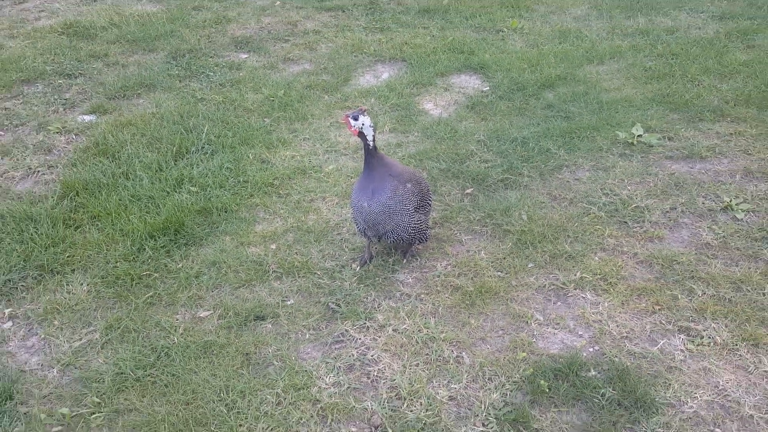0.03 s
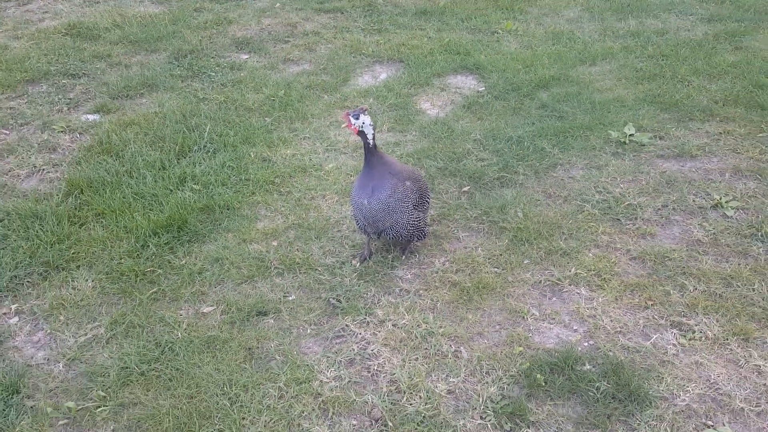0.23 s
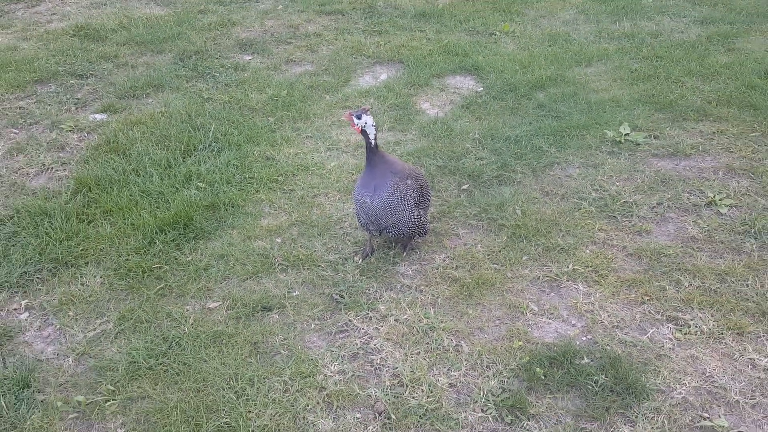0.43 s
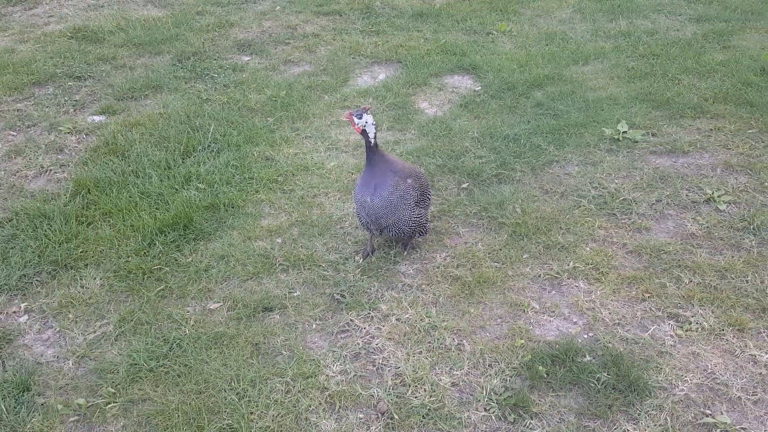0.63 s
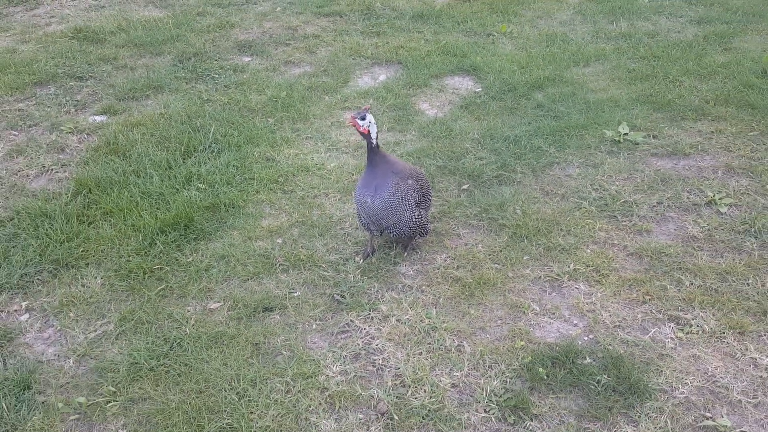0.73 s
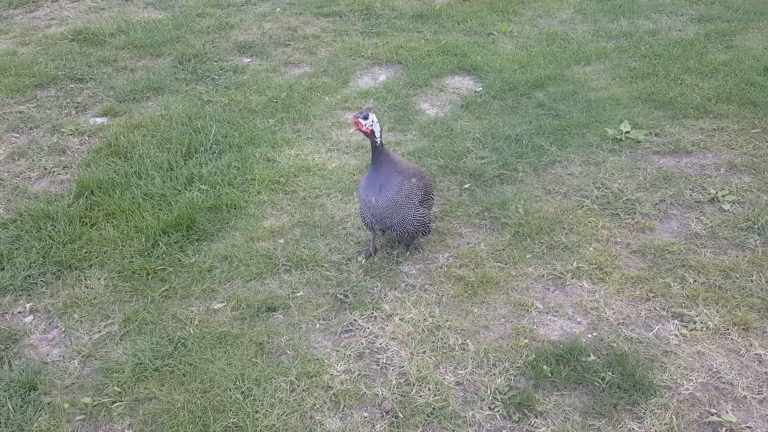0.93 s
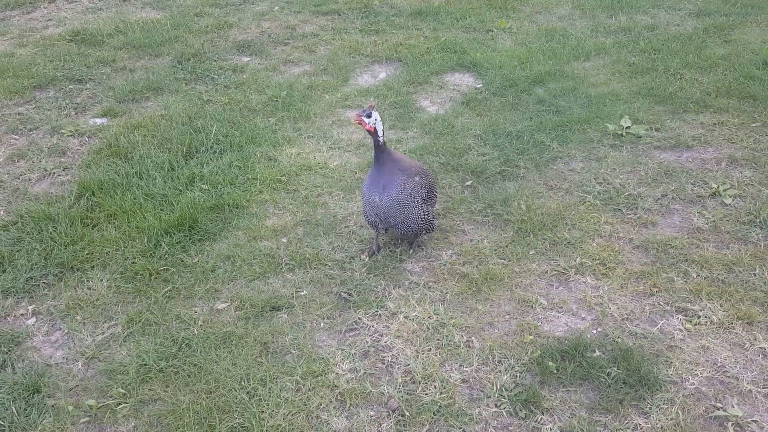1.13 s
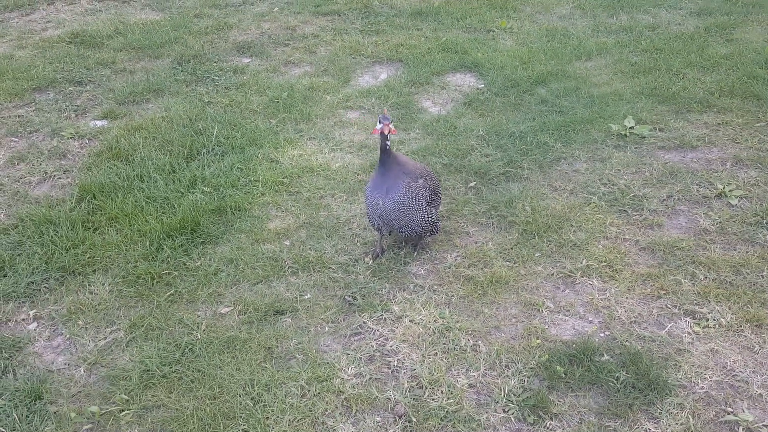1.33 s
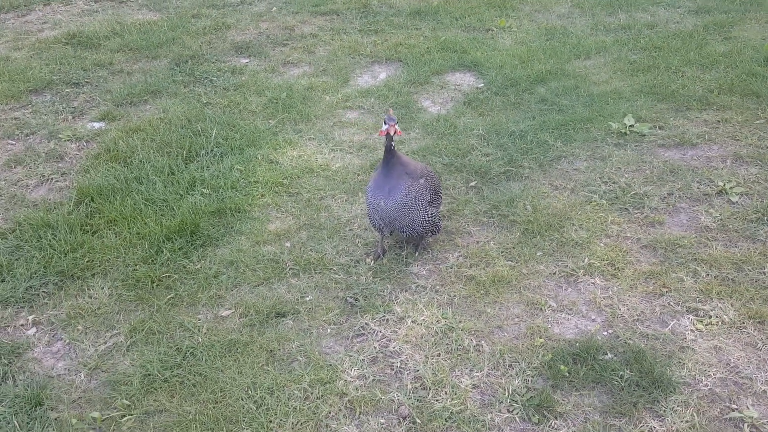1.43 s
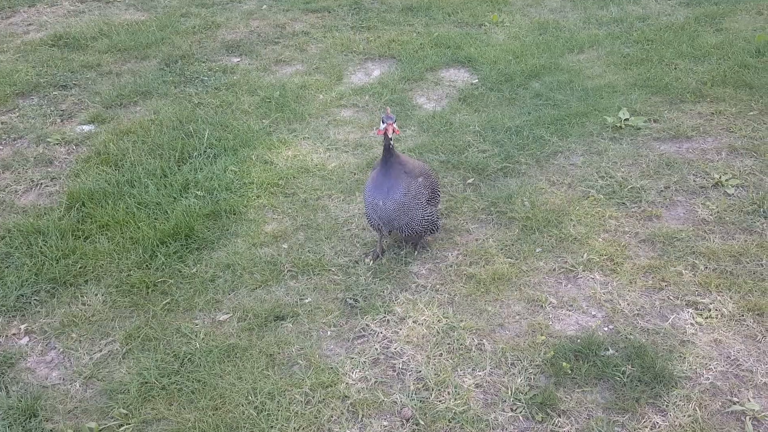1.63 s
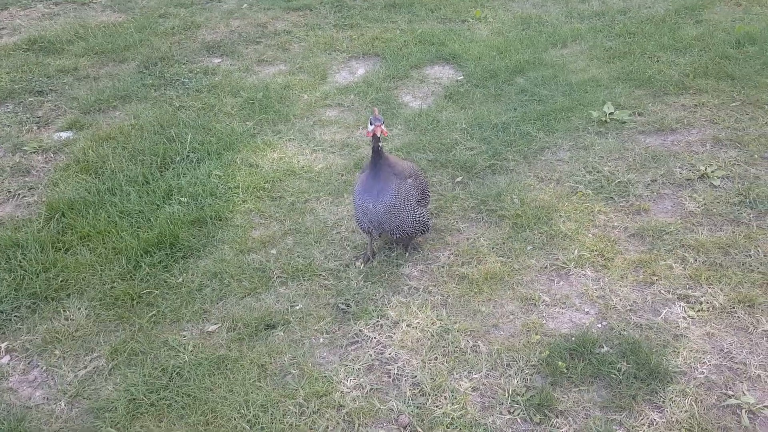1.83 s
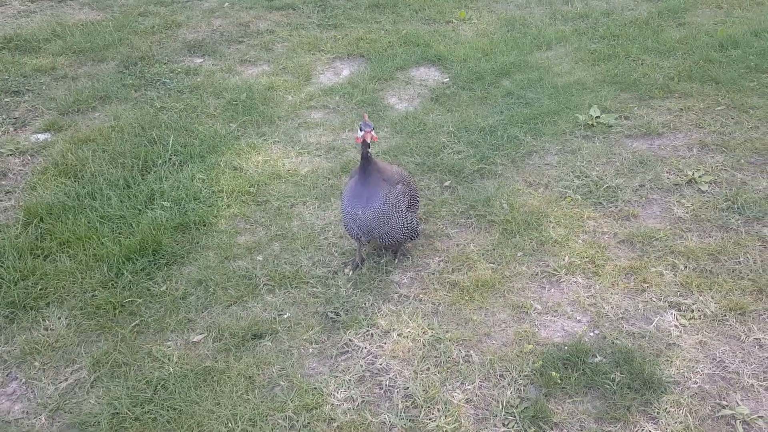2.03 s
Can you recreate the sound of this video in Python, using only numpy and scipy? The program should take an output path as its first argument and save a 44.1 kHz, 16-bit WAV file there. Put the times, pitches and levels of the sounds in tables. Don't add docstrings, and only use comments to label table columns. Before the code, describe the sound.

A guinea fowl in front of a stereo microphone outdoors clucks softly at the very start, then gives a short, loud whistle near 0.23 seconds that stutters into a rasp by 0.36. Cluck and call repeat at 0.72 and 0.95, then 1.47 and 1.73, growing harsher and hissier, ending near 1.86. Faint small-bird chirps fall between and after; steady low distant traffic rumbles beneath.

```python
import sys
import numpy as np
from scipy import signal
from scipy.fft import rfft, irfft
from scipy.io import wavfile
from scipy.ndimage import uniform_filter1d

SR = 44100
rng = np.random.default_rng(int(sys.argv[2]) if len(sys.argv) > 2 else 0)


def master(y):
    cut = np.clip(np.atleast_2d(y).T, -1, 1)
    pcm = np.round(cut * 32767)
    wavfile.write(sys.argv[1], SR, pcm.astype(np.int16))


def decibels_to_gain(level_db):
    exponent = np.asarray(level_db, float) / 20
    return 10 ** exponent


N = 92610
T = np.arange(N) / SR


def at_hz(points, hz):
    table = np.array(points)
    return np.interp(np.log(hz), np.log(table[:, 0]), table[:, 1])


def spectrum_hz():
    return np.arange(N // 2 + 1) * SR / N + 1


def rms_one(x):
    return x / np.sqrt(np.mean(x ** 2) + 1e-20)


def drift(rate_hz):
    r = np.exp(-2 * np.pi * rate_hz / SR)
    wander = signal.lfilter([1], [1, -2 * r, r * r], rng.standard_normal(N + SR))
    return rms_one(wander[SR:])


def resonate(x, peaks):
    out = 0
    for k, (hz, width, db) in enumerate(peaks):
        r = np.exp(-np.pi * width * 1.5 / SR)
        b = (1 - r * r) / 2 * np.array([1, 0, -1])
        a = [1, -2 * r * np.cos(2 * np.pi * hz / SR), r * r]
        ringing = signal.lfilter(b, a, signal.lfilter(b, a, x))
        out = out + (-1) ** k * decibels_to_gain(db) * ringing
    return rms_one(out)


def glide(start, length, hz, db, soft=.5):
    u = np.clip((T - start) / length, 0, 1)
    pitch = np.polyval(np.polyfit([0, .5, 1], hz, 2), u)
    swell = np.sin(np.pi * u).clip(0) ** soft * (u < 1)
    return 2 * decibels_to_gain(db) * swell * np.sin(2 * np.pi * np.cumsum(pitch) / SR)


# [f/Hz, level/dB per Hz]
AIR_SPECTRUM = [(25, -24.5), (62, 2), (110, -0.5), (350, -14), (1500, -17), (4200, -26.5), (9500, -52.5),
                (13000, -58)]
# [f/Hz, likeness -1..1]
AIR_LIKENESS = [(60, 0.98), (240, 0.91), (950, -0.16), (3770, 0.091), (15000, -0.39)]


def air():
    out, together = 0, drift(2.0)
    edges = 22 * 2 ** np.arange(0, 9.6, .5)
    white = rng.standard_normal((2, 2, N + SR // 4))
    for k, (low, high) in enumerate(zip(edges, edges[1:])):
        band = signal.butter(2, [low, high], "band", fs=SR, output="sos")
        mid, side = signal.sosfilt(band, white[k % 2])[:, SR // 4:]
        alike = np.clip(at_hz(AIR_LIKENESS, np.sqrt(low * high)), -1, 1)
        gain = decibels_to_gain(0.16 * together + 2.14 * drift(8.9))
        out = out + gain * (np.sqrt(1 + alike) * mid + np.sqrt(1 - alike) * side * [[1], [-1]])
    colored = irfft(rfft(out) * decibels_to_gain(at_hz(AIR_SPECTRUM, spectrum_hz())), N)
    return decibels_to_gain(-35.5) * rms_one(colored)


# [t/s, level/dB]
YARD_ECHOES = [
    (.115, -42),
]


def yard(x):
    tail_db, t60_s = -29, .4
    t = np.arange(SR // 2) / SR
    tail = rng.standard_normal((2, len(t))) * decibels_to_gain(-60 * t / t60_s) * (t > .01)
    tail = decibels_to_gain(tail_db) * tail / np.sqrt(np.sum(tail ** 2, axis=1, keepdims=True))
    for s, db in YARD_ECHOES:
        tail[:, int(s * SR)] += decibels_to_gain(db)
    return signal.fftconvolve(x[None], tail, axes=1)[:, :N]


# [t/s, length/s, start f/Hz, middle f/Hz, end f/Hz]
CHIRP_GLIDES = [(.404, .022, 4700, 5600, 4600), (.424, .019, 4700, 4400, 4150),
                (.491, .024, 3700, 4850, 3700), (.81, .012, 4000, 4300, 4500), (.82, .01, 4700, 4700, 3800),
                (.829, .007, 3900, 4200, 4100), (.846, .022, 3350, 3300, 3100),
                (.868, .025, 2900, 2700, 2550), (1.201, .011, 3200, 3500, 4000),
                (1.212, .019, 4400, 4720, 4750), (1.23, .01, 4750, 5500, 4200),
                (1.239, .017, 4150, 3800, 3550), (1.255, .007, 3550, 3300, 3000),
                (1.262, .024, 3700, 4050, 3850), (1.278, .026, 3150, 3550, 4150),
                (1.303, .009, 4250, 4200, 3800), (1.312, .016, 3550, 3200, 3000),
                (1.618, .016, 4800, 4650, 4350), (1.634, .011, 4400, 4100, 3400),
                (1.647, .012, 4250, 4050, 3400), (1.679, .012, 3600, 3600, 3000),
                (1.693, .007, 3350, 3400, 3350), (1.702, .007, 3250, 3300, 3350),
                (1.969, .019, 3850, 4250, 4500), (1.974, .016, 3350, 3620, 3800),
                (1.988, .024, 3800, 3600, 3300), (2.01, .034, 3330, 2930, 2620),
                (2.042, .017, 2640, 2580, 2520), (1.222, .04, 1680, 1660, 1600),
                (1.26, .012, 1250, 1030, 980), (1.266, .028, 2000, 2000, 1990)]
CHIRP_LEVELS = [-58, -51, -48.5, -49, -46, -46, -49, -58, -58, -63, -59, -51, -50.5, -49, -45.5, -56, -49,
                -39, -48, -43, -41.5, -42, -48, -52, -53, -46.5, -46, -54, -46, -46, -50.5]


def small_birds():
    chirps = 0
    for (s, length, *hz), db in zip(CHIRP_GLIDES, CHIRP_LEVELS):
        chirps = chirps + glide(s, length, hz, db, soft=.3)
    return chirps * decibels_to_gain(1.5 * drift(100))


# [f/Hz, left over right level/dB]
FOWL_PAN = [(1560, 4), (1690, 1.5), (2400, 4), (3100, 1.3), (4600, .5), (13000, -3.5)]
# [f/Hz, left lead/radians]
FOWL_LEAD = [(1550, 0.28), (4600, 0.5), (13000, 0.95)]


def place(x, more_lead):
    hz = spectrum_hz()
    lead = at_hz(FOWL_LEAD, hz) + more_lead * np.minimum(1, 1550 / hz) ** 2
    half = decibels_to_gain(at_hz(FOWL_PAN, hz) / 2) * np.exp(.5j * lead)
    return np.array([irfft(rfft(x) * half, N), irfft(rfft(x) / half, N)])


def slaps():
    rate_hz = 1540 * (1 + 0.044 * drift(300))
    beat = np.diff(np.floor(np.cumsum(rate_hz) / SR), prepend=0)
    return beat * (drift(180) + rng.standard_normal(N)) + .2 * rng.standard_normal(N)


# [f/Hz, width/Hz, level/dB]
HISS_PEAKS = [(7600, 700, 1), (9100, 500, -2), (10900, 500, 0), (11900, 700, -2)]
# [f/Hz, width/Hz, level/dB]
BEAK_TIP_PEAK = [(14200, 340, 0)]


def rough(throat, air_s, rasp_s, end_s, rasp_db, hiss_db):
    edge_s, leak, sag = 0.0071, decibels_to_gain(-15), decibels_to_gain(-5.5)
    times = [air_s - edge_s, air_s, rasp_s - edge_s, rasp_s + edge_s, end_s - edge_s, end_s + edge_s]
    low = np.interp(T, times, [0, leak, leak, 1, sag, 0])
    high = np.interp(T, times, [0, .6, .7, 1, .5, 0])
    breath = rng.standard_normal(N)
    tip_gain = decibels_to_gain(np.interp(T, [rasp_s, end_s], [0, -24])) * 0.58
    hiss = resonate(breath, HISS_PEAKS) + tip_gain * resonate(breath, BEAK_TIP_PEAK)
    return decibels_to_gain(rasp_db) * low * resonate(slaps(), throat) + decibels_to_gain(hiss_db) * high * hiss


# [t/s, level/dB, low squeak level/dB, high squeak level/dB, beak hiss level/dB]
CLUCK_HITS = [
    (-.016, -36, -2, -5, -72),
    (.717, -33, -3, -10, -69),
    (1.471, -29, -11, -8, -58),
]
# [t/s after its start, length/s, start f/Hz, end f/Hz, level/dB]
CLUCK_SQUEAKS = [(0, .028, 2500, 2550, -9), (.017, .033, 3100, 2950, -11), (.001, .022, 5000, 5150, -8),
                 (.016, .024, 5400, 5850, -15.5), (.022, .032, 6300, 5750, -17),
                 (.028, .02, 4800, 4680, -7), (.028, .025, 1330, 1270, -7)]
# [air t/s, rasp t/s, end t/s after its start]
CLUCK_ROUGH = (.018, .03, .052)
# [f/Hz, width/Hz, level/dB]
CLUCK_PEAKS = [(1300, 80, -2), (1700, 200, -6), (1050, 100, -9), (2400, 400, -17), (4600, 400, -15),
               (5800, 600, -22)]


def clucks():
    out = 0
    for s, db, low_db, high_db, hiss_db in CLUCK_HITS:
        out = out + rough(CLUCK_PEAKS, *(s + np.array(CLUCK_ROUGH)), db - 1, hiss_db)
        for after, length, a, b, part_db in CLUCK_SQUEAKS:
            register_db = 0 if a < 2000 else low_db if a < 4000 else high_db
            squeak = glide(s + after, length, [a, (a + b) / 2, b], db + part_db + register_db)
            out = out + squeak * decibels_to_gain(2.0 * drift(150))
    return out


# [air t/s, rasp t/s, end t/s, rasp level/dB, beak hiss level/dB]
CALL_RASPS = [
    (0.232, 0.322, 0.363, -28, -73),
    (0.958, 1.029, 1.083, -25.5, -58),
    (1.726, 1.772, 1.858, -24, -52),
]
# [f/Hz, width/Hz, level/dB]
CALL_THROAT = [(1107, 35, -3), (1560, 150, -8), (1860, 174, -9.5), (2447, 330, -12), (3150, 480, -25),
               (4587, 470, -13), (5280, 243, -13.5), (5757, 500, -22.5)]


def rasps():
    return sum(rough(CALL_THROAT, *r) for r in CALL_RASPS)


# [t/s, length/s, peak level/dB, f/Hz]
RASP_STUTTERS = [(0.321, 0.0032, -17.2, 1590.0), (0.3258, 0.002, -18, 1690.0),
                 (0.3272, 0.0027, -19.5, 1760.0), (0.33, 0.0037, -21, 1710.0), (0.334, 0.0052, -21, 1730.0),
                 (0.3376, 0.0084, -22, 1630.0), (0.347, 0.0029, -24, 1680.0), (0.3495, 0.0015, -32, 1620.0),
                 (0.3505, 0.011, -20, 1610.0), (0.363, 0.0025, -39, 1500.0), (1.034, 0.0027, -19.5, 1610.0),
                 (1.0368, 0.011, -15, 1570.0), (1.0474, 0.0079, -19.5, 1570.0),
                 (1.0546, 0.0049, -21.6, 1550.0), (1.0598, 0.0055, -26, 1590.0),
                 (1.064, 0.0024, -27.5, 1620.0), (1.0647, 0.0034, -22.5, 1560.0),
                 (1.0698, 0.0073, -18.5, 1540.0), (1.075, 0.0068, -19.5, 1590.0),
                 (1.0793, 0.014, -27.6, 1500.0), (1.777, 0.0083, -16, 1640.0), (1.784, 0.0052, -19, 1600.0),
                 (1.7883, 0.011, -17.5, 1580.0), (1.7981, 0.0084, -20.5, 1620.0),
                 (1.8022, 0.0088, -16, 1590.0), (1.8142, 0.0092, -18, 1570.0),
                 (1.825, 0.0024, -17.3, 1640.0), (1.8279, 0.0067, -15, 1560.0),
                 (1.8347, 0.0095, -18, 1580.0), (1.8452, 0.0076, -20.5, 1600.0),
                 (1.8528, 0.0109, -26, 1500.0)]


def stutters():
    shake = np.exp(.35j * drift(150))
    tone = sum(glide(s, length, [hz, hz, hz], db - 7, soft=0.72) for s, length, db, hz in RASP_STUTTERS)
    swell = signal.hilbert(tone) * shake
    third = np.abs(swell) * np.cos(3 * np.angle(swell))
    return np.real(swell) + decibels_to_gain(-17) * third


# [multiple of low membrane, multiple of unlocking, level/dB]
WHISTLE_PARTIALS = [(1, 0, 0), (1, 1, -13), (1, 2, -27), (2, 1, -24), (3, 1, -15), (3, 2, -30), (4, 2, -44),
                    (5, 2, -45), (6, 3, -58), (7, 3, -65)]


def whistle(call, facing_db):
    s, *columns = np.transpose(call)
    hz, split, db, odd_db, even_db = [np.interp(T, s, c) for c in columns]
    low = 2 * np.pi * np.cumsum(hz * (1 + .002 * drift(60))) / SR
    apart = 2 * np.pi * np.cumsum(split * (split > 0)) / SR
    loose, out = np.clip(split / 200, .1, 1), 0
    for m, k, part_db in WHISTLE_PARTIALS:
        own_hz = m * hz - k * split
        trim = facing_db * (m > 3) * (.2 if m % 2 else 1)
        slide = uniform_filter1d(np.gradient(own_hz) * SR / m, size=60) / 6000
        trim = trim - (m > 3) * 10 * np.log10(1 + slide ** 4)
        trim = trim - 20 * (m == 5) * np.clip((own_hz - 8100) / 300, 0, 1)
        overtone_db = (m > 1) * (odd_db if m % 2 else even_db)
        gain = decibels_to_gain(part_db + trim + overtone_db) * (1 if k == m // 2 else loose)
        out = out + gain * np.sin(m * low - k * apart)
    gate = np.clip((T - s[0]) / 0.0015, 0, 1) * (T < s[-1])
    return np.sqrt(2) * decibels_to_gain(db + .5 * drift(71)) * out * gate


# [t/s, low membrane f/Hz, unlocking of the high membrane f/Hz, level/dB,
# odd overtones level/dB, even overtones level/dB]
WHISTLE_1 = [
    (.217, 1787, -10, -73, -21, 45),
    (.232, 1759, -1.5, -34.5, 6, 21.5),
    (.2445, 1733, 2, -24, 2.5, 3.5),
    (.247, 1633, 205.5, -15.5, 10, -0.5),
    (.253, 1543, -0.5, -26, 11.5, 20.5),
    (.262, 1506, -7.5, -10, -5.5, -2.5),
    (.313, 1560, 0.5, -10.8, 3, 0.5),
    (.321, 1602, -5, -21.5, 4, 11),
    (.329, 1650, 1.5, -49.5, 6.5, -6.5),
]
# [t/s, low membrane f/Hz, unlocking f/Hz, level/dB, odd level/dB, even level/dB]
WHISTLE_2 = [
    (0.927, 1782, -4, -55.5, -19, 28.5),
    (0.956, 1765, -5, -39.5, 13, 14),
    (0.967, 1697, -10, -28.5, 9.5, 6),
    (0.968, 1663, 306, -18.5, 11.5, 2),
    (0.991, 1694, 282.5, -23.5, 15.5, 16.5),
    (.994, 1556, -2, -31.5, 2.5, 22.5),
    (0.999, 1514, 0, -10.5, 4.5, -7.5),
    (1.026, 1556, -12.5, -10.5, 0.5, 1),
    (1.04, 1532, -1, -27.5, 8, -11),
]
# [t/s, low membrane f/Hz, unlocking f/Hz, level/dB, odd level/dB, even level/dB]
WHISTLE_3 = [
    (1.71, 1780, 11, -68, 4, 20),
    (1.726, 1738, -7, -33.5, 14, 18.5),
    (1.731, 1659, 292, -25.5, 13, 8),
    (1.740, 1648, 278, -24, 15.5, 6),
    (1.743, 1535, -10, -19.5, -3, 8),
    (1.757, 1539, 2, -31, 4, 17.5),
    (1.762, 1533, 3, -12, 3.5, -6),
    (1.774, 1558, -6, -9, 0, -21),
    (1.782, 1590, 0, -49, -5, 2),
]
HEAD_FACING = [-3., 0., 16.]


def fowl():
    whistles = sum(map(whistle, (WHISTLE_1, WHISTLE_2, WHISTLE_3), HEAD_FACING))
    return whistles + rasps() + stutters() + clucks()


def scene():
    bird, small = fowl(), small_birds()
    step_s, step_lead = .6, .56
    direct = place(bird * (T < step_s), step_lead) + place(bird * (T >= step_s), 0)
    chirps = small * decibels_to_gain(np.array([[.5], [-.5]]) * 2.5)
    return direct + yard(bird + 22.0 * small) + chirps + air()


def roll_off(x):
    return signal.sosfilt(signal.butter(12, 16010, fs=SR, output="sos"), x)


MIC_HISS = [
    [-75],
    [-72],
]


def record(dry):
    treble = signal.butter(4, 10700, "high", fs=SR, output="sos")
    hiss = signal.sosfilt(treble, rng.standard_normal(dry.shape))
    top_cut = signal.ellip(14, .5, 80, 15740, fs=SR, output="sos")
    mix = signal.sosfilt(top_cut, dry + decibels_to_gain(np.array(MIC_HISS)) * hiss)
    return roll_off(mix)


dry = scene()
out = record(dry)
master(out)
```